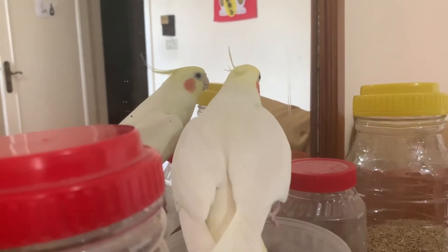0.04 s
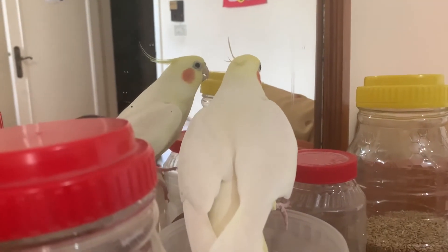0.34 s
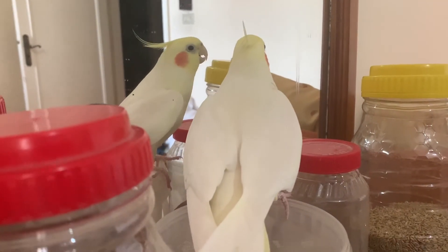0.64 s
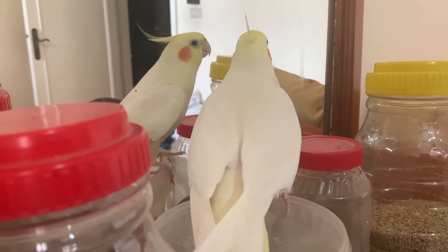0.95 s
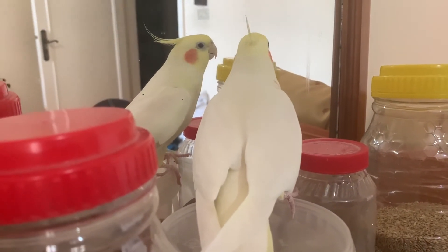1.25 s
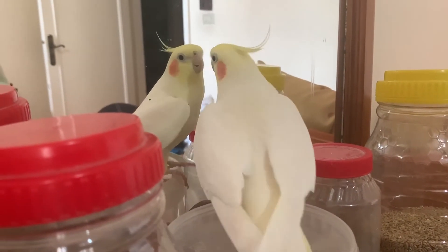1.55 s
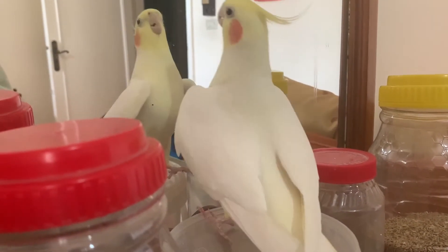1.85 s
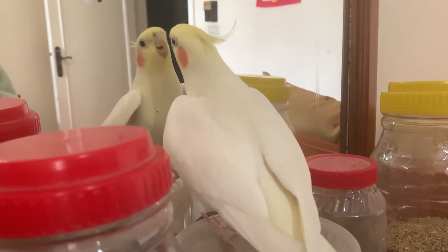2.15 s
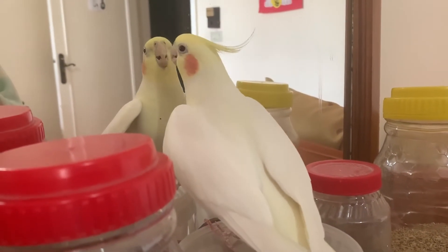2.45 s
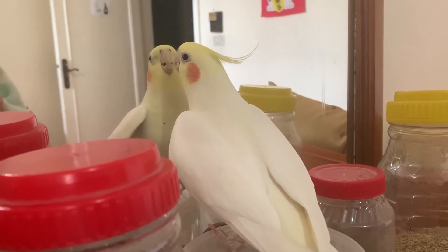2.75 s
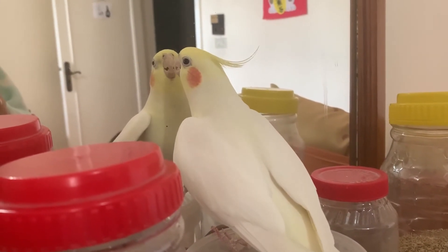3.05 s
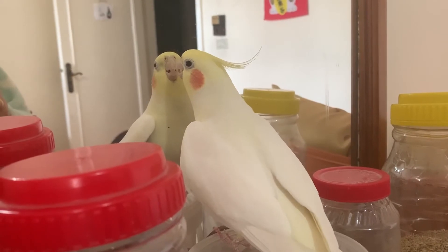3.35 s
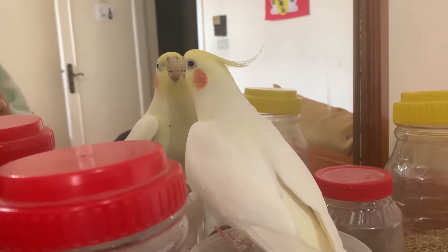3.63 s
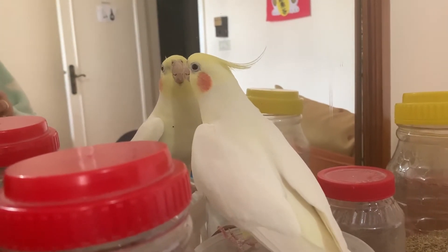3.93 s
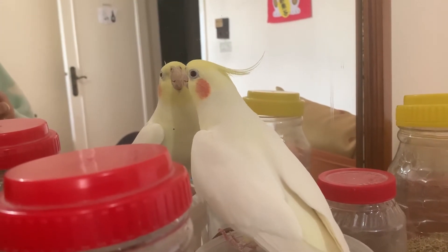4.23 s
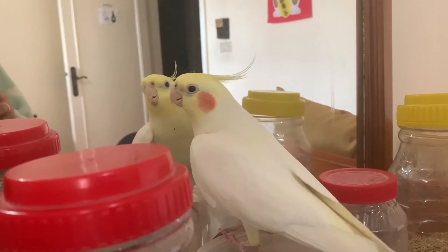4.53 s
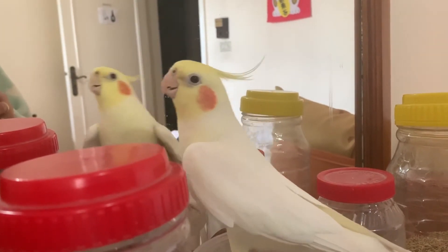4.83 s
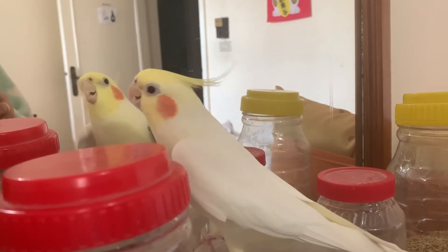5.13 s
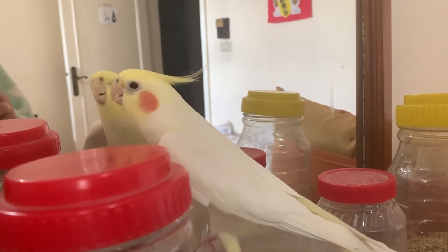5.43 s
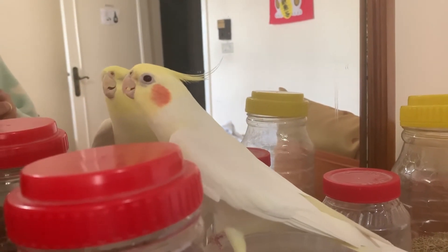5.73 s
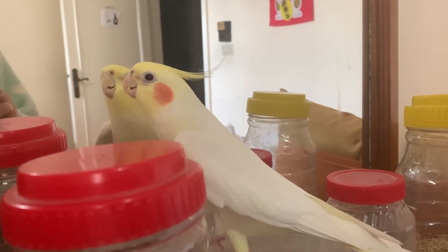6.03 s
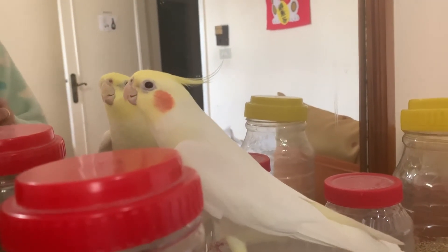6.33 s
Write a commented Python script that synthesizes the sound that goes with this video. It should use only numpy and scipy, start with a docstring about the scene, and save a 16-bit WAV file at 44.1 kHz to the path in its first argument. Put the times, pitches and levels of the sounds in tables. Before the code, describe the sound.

A cockatiel twice shuffles on a plastic tub, then chirps, pips and gives a long, sagging whistle in a faintly humming room.

```python
"""Cockatiel at its mirror

In a small room, heard through a two-port stereo microphone, a cockatiel on the rim of a plastic tub
sings to its mirror image. Twice it shuffles (feathers rustle, claws tick, the tub knocks), then gives
a rising chirp, a short pip and a long whistle that sags at its end. Behind it an appliance hums
faintly, and faint calls come from far off."""
import sys
import numpy as np
from scipy import signal
from scipy.fft import rfft, irfft, next_fast_len
from scipy.io import wavfile

SR = 44100
rng = np.random.default_rng(int(sys.argv[2]) if len(sys.argv) > 2 else 0)


def unload_wav(signal):
    """Save mono or channel-first audio to the path in sys.argv[1] as 16-bit WAV at rate SR, clipped to [-1, 1]."""
    wavfile.write(
        sys.argv[1],
        SR,
        np.round(np.clip(np.atleast_2d(signal).T, -1, 1) * 32767).astype(np.int16),
    )


N = 285768
T = np.arange(N) / SR

# footfalls on the tub: t/s, ring level/dB, tub pitch as a ratio to its rest, slap level/dB
FOOTFALLS = [(.164, -49.5, 0.95, -69), (1.568, -48, 1.09, -59), (1.585, -39, 1.01, -48.5),
             (1.673, -48.5, 1.6, -38.5), (1.678, -43, 1, -46.5), (1.7715, -52, 2.5, -36),
             (1.7925, -31.5, 1.07, -40), (4.539, -57, 2.4, -45), (4.631, -47.5, 1.09, -66),
             (4.7461, -22.5, 1.03, -40)]


def from_db(db):
    return 10 ** (np.asarray(db) / 20)


def rms_one(x):
    return x / np.sqrt(np.mean(x ** 2) + 1e-20)


def at_hz(points, hz, column=1):
    """Reads a column of a table along log frequency."""
    points = np.array(points, float)
    return np.interp(np.log(np.maximum(hz, 1)), np.log(points[:, 0]), points[:, column])


def in_time(curve, t):
    """Reads a curve of (time, value) points at times t."""
    return np.interp(t, *np.transpose(curve))


def gate(t, start, end, rise, fall):
    """Smooth opening and closing of a note."""
    return np.sin(np.pi / 2 * np.clip((t - start) / rise, 0, 1) * np.clip((end - t) / fall, 0, 1)) ** 2


def swell(middle, length):
    """A smooth rise and fall around a moment."""
    return gate(T, middle - length / 2, middle + length / 2, length / 2, length / 2)


def drift(rate_hz):
    """Random wander up to about rate_hz, rms 1."""
    hz = np.arange(N // 2 + 1) * SR / N
    return rms_one(irfft(rfft(rng.standard_normal(N)) / (1 + (hz / rate_hz) ** 4), N))


def noise(colour):
    """Noise of a given colour, rms 1."""
    hz = np.arange(N // 2 + 1) * SR / N
    return rms_one(irfft(rfft(rng.standard_normal(N)) * from_db(at_hz(colour, hz)), N))


def phase_of(hz):
    return 2 * np.pi * np.cumsum(hz) / SR


def sine(phase, db):
    """A sine of the given rms level."""
    return np.sqrt(2) * from_db(db) * np.sin(phase)


def room_air(level_db=-55.5, side_db=-15):
    """The steady air of the room, slightly different left and right."""
    colour = [(20, -14.5), (37, -8), (60, 1), (88, -9.5), (154, -6), (193, -19), (230, -18), (430, -28),
              (760, -26), (1480, -36), (2140, -40.5), (4500, -49), (6000, -55.5), (12000, -50.5),
              (16000, -57.5)]  # f/Hz, relative density/dB
    return from_db(level_db) * (noise(colour) + from_db(side_db) * noise(colour) * np.array([[1], [-1]]))


def low_wash(level_db=-72, swell_db=5.5, swell_hz=1.3):
    """A low wash of noise in the room, slowly swelling and ebbing."""
    colour = [(120, -16.5), (280, 2.5), (600, 9), (850, -12.5), (1500, -0.5), (2200, -38.5)]  # f/Hz, relative density/dB
    return from_db(level_db + swell_db * drift(swell_hz)) * noise(colour)


def appliance_hum(waver=0.09, wander_rad=1.0):
    """An appliance hums: a few low tones, wavering in level and phase."""
    tones = [(57.5, -64.5), (115, -64), (160, -72.5), (229, -71)]  # f/Hz, level/dB
    return sum(sine(2 * np.pi * hz * T + wander_rad * drift(0.8), db) * (1 + waver * drift(4.9))
               for hz, db in tones)


def far_calls(blur_hz=450, fall_per_s=.6):
    """Faint calls far off: clear ones hold their pitch, blurred ones are noisy and fall."""
    calls = [(.02, .12, 803, -64, 0), (0.256, 0.15, 1320, -71.5, 0.13), (.49, 0.25, 754, -65, 0.1),
             (.48, 0.21, 4080, -74.5, 0.83), (1.19, .14, 3340, -80, 0.7), (1.98, .2, 3740, -77, 0.8),
             (3.769, .19, 3703, -74.5, 0.67), (6.41, .28, 4400, -78.5, 1)]  # peak t/s, length/s, f/Hz, level before blurring/dB, blur 0-1
    out, smear = np.zeros(N), drift(blur_hz)
    for peak, length, hz, db, blur in calls:
        pitch = hz * (1 - fall_per_s * blur * np.clip(T - peak, -length, length))
        out += sine(phase_of(pitch), db) * (1 - blur + blur * smear) * swell(peak, length)
    return out


def feathers(grain_db=3.0, patchy_db=3, gain_db=1, bands=10):
    """Barbs slip over each other in clumps, each patch of feather with a colour of its own."""
    strokes = [(1.526, 0.15, -58), (1.646, 0.19, -55), (1.816, 0.23, -63.5), (4.475, 0.27, -58.5),
               (4.597, 0.12, -52), (5.807, 0.087, -69)]  # feather on feather: peak t/s, length/s, level before gain/dB
    colour = [(600, -20.5), (1400, 9), (2000, -9.5), (2600, 14.5), (4200, -3.5), (5300, -6), (6800, 0),
              (8300, 6.5), (10000, -1.5), (12400, -3.5), (15500, -1.5)]  # f/Hz, relative density/dB
    envelope = sum(from_db(db) * swell(peak, length) for peak, length, db in strokes)
    brush, patches = noise(colour), np.zeros(N)
    edges_hz = np.geomspace(600, 17000, bands + 1)
    for k, band in enumerate(zip(edges_hz, edges_hz[1:])):
        bandpass = signal.butter(2, band, "band", fs=SR, output="sos")
        patch = signal.sosfilt(bandpass, np.roll(brush, k * N // bands))
        patches += patch * from_db(patchy_db * drift(22))
    return from_db(gain_db) * envelope * rms_one(patches * from_db(grain_db * drift(250)))


def claw_ticks(t60=0.022, gain_db=-5.0, footfall_db=-5):
    """Claws and beak make short dry scratches, alone and with every footfall."""
    lone_ticks = [(0.167, -47.5), (.272, -58), (1.5977, -34), (1.711, -45), (2.111, -55), (2.162, -59),
                  (4.4192, -51.5), (4.570, -32.5), (4.598, -44.5), (4.7404, -32), (4.8892, -35.5)]  # t/s, level before gain/dB
    colour = [(700, -4.5), (1500, 1), (3200, -1.5), (4800, 2.5), (6500, -9.5), (8500, 5), (12000, 2.5),
              (15500, -7.5)]  # f/Hz, relative density/dB
    touches = lone_ticks + [(start, slap_db + footfall_db) for start, _, _, slap_db in FOOTFALLS]
    envelope = sum(from_db(db - 60 * np.clip(T - start, 0, .1) / t60) * (T >= start)
                   for start, db in touches)
    return from_db(gain_db) * envelope * noise(colour)


def tub_knocks(contact_s=0.0024, slap_t60=0.019):
    """Each footfall slaps the tub and sets it ringing; the gripping foot shifts its pitch."""
    modes = [(310, -14, 0.013), (359, 4, 0.041), (486.4, 7, 0.027), (569.4, -3, 0.046), (845, -40, 0.054),
             (1210, -8.5, 0.031), (1930, -34, 0.012), (2322, -22.5, 0.016), (3000, -27, 0.043)]  # the tub at rest: f/Hz, relative level/dB, t60/s
    slap_colour = [(250, -15.5), (600, 1.5), (1600, -8.5), (2400, 2), (3500, -17.5), (6000, -25)]  # f/Hz, relative density/dB
    out, age, slap = np.zeros(N), T[:SR // 5], noise(slap_colour)
    for start, ring_db, shift, slap_db in FOOTFALLS:
        ring = 0
        for hz, mode_db, t60 in modes:
            decay = from_db(ring_db + mode_db + rng.normal(0, 1) - 60 * age / t60)
            ring += decay * np.sin(2 * np.pi * hz * shift * age)
        here = int(start * SR) + np.arange(len(age))
        out[here] += ring * (1 - np.exp(-age / contact_s))
        out[here] += slap[here] * from_db(slap_db - 60 * age / slap_t60)
    return out


def chirps(beak_db=9, beak_width_hz=280, ring_hz=6500, ring_width_hz=500,
           rasp_db=-19, relax_db=10.5, flicker_db=3.5, count=13):
    """A fast upward sweep; the overtones open with the strain and flare at the beak's resonances."""
    # t/s, length/s, start f/Hz, end f/Hz, fundamental level/dB, overtone base level/dB,
    # beak resonance f/Hz, moment of most strain 0-1, gain at ring_hz/dB
    sweeps = [(2.3127, .047, 1028, 1774, -25.5, -22.5, 3178, 0.65, -0.5),
              (4.9101, .041, 1032, 1700, -33, -23, 2925, 0.58, 9)]
    throat = [(1000, -16), (2300, -2), (3400, -4.5), (4400, -2.5), (5300, -9), (6300, -14.5), (7400, -26.5),
              (8400, -21.5), (9800, -38.5), (11500, -33), (15500, -35.5)]  # throat and open beak: f/Hz, gain/dB
    out, rasp = np.zeros(N), noise(throat)
    shake = .012 * drift(900) + .012 * drift(120)
    flicker = drift(130)
    for start, length, low_hz, high_hz, note_db, overtone_db, beak_hz, strain_at, ring_db in sweeps:
        on = (T > start) & (T < start + length)
        progress = (T[on] - start) / length
        pitch = low_hz + (high_hz - low_hz) * progress
        phase = phase_of(pitch * (1 + shake[on]))
        slack_db = relax_db * (2 * (progress - strain_at)) ** 2
        pulsed_rasp = rasp[on] * (1 + np.cos(phase))
        note = sine(phase, note_db) + from_db(overtone_db + rasp_db - slack_db) * pulsed_rasp
        for k in range(2, count):
            hz = k * pitch
            off_beak, off_ring = (hz - beak_hz) / beak_width_hz, (hz - ring_hz) / ring_width_hz
            colour_db = at_hz(throat, hz) + beak_db / (1 + off_beak ** 2) + ring_db / (1 + off_ring ** 2)
            uneven_db = flicker_db * np.roll(flicker, k * N // count)[on]  # each flickers on its own
            db = overtone_db + colour_db + uneven_db - slack_db * min(k - 1.5, 3.2)
            note += sine(k * phase - np.arctan(off_beak), db)  # the resonance turns the phase
        out[on] += note * gate(T[on], start, start + length, rise=0.0091, fall=0.015)
    return out


def pips(mellow_db_per_s=900, buzz_hz=13000, buzz_db_per_octave=22, swell_db=8, count=13):
    """A pip starts with a buzzy snap and mellows at once into a pure tone."""
    # t/s, length/s, f/Hz, level/dB; relative to that at the attack:
    # second harmonic/dB, fall per further harmonic/dB, buzz peak/dB
    notes = [(2.513, 0.053, 1204, -17.5, -4.5, 21.5, -35), (5.09, 0.054, 1199, -24.5, -6.5, 6, -20.5)]
    out, waver = np.zeros(N), drift(110)
    for start, length, pitch, db, bright_db, fall_db, buzz_db in notes:
        on = (T > start) & (T < start + length)
        age = T[on] - start
        phase = phase_of(pitch * (1 + 0.023 * waver[on]))
        note = sine(phase, db - swell_db * (2 * age / length - 1) ** 2)
        for k in range(2, count + 1):
            octaves_off = abs(np.log2(k * pitch / buzz_hz))
            snap_db = max(bright_db - fall_db * (k - 2), buzz_db - buzz_db_per_octave * octaves_off)
            uneven_db = 3 * np.roll(waver, k * N // count)[on]
            note += sine(k * phase, db + snap_db + uneven_db - mellow_db_per_s * age)
        out[on] += note * gate(T[on], start, start + length, rise=0.0028, fall=0.018)
    return out


def voice_crack(t, phase, note_db, count=7):
    """The voice cracks into half pitch: alternate cycles differ, adding lines between the harmonics."""
    crack = (5.232, 5.273, -25)  # start t/s, end t/s, level against the note/dB
    start, end, crack_db = crack
    lines = sum(sine((k + .5) * phase, note_db + crack_db - 16 * np.log2(max(k, 1)))
                for k in range(count))
    return lines * gate(t, start, end, rise=0.013, fall=0.0023)


def whistles(tremor_db=1.0, flutter_db=1.5, breath_db=-47, fourth_db=-37.5, count=15):
    """A nearly pure held note with a slight tremor; as its pitch sags it weakens and gains the octave."""
    # t/s, length/s, level/dB, release/s, second harmonic against the note/dB,
    # fifth and higher harmonics against the third/dB
    notes = [(2.64, 0.909, -24.5, 0.16, -33.5, -13.5), (5.226, 0.7606, -24.5, 0.028, -48, -12.5)]
    melodies = [
        [(2.66, 1104), (3.102, 1100), (3.124, 1066), (3.204, 1078), (3.338, 1046), (3.352, 1022), (3.48, 1001)],
        [(5.28, 1095), (5.328, 1102), (5.344, 1119), (5.428, 1118), (5.526, 1091), (5.762, 1106), (5.822, 1076),
         (5.936, 1061), (5.972, 997.6)],
    ]  # pitch of each whistle: t/s, f/Hz
    third_curves = [
        [(2.645, -79), (2.683, -63.5), (2.801, -71), (2.915, -69.5), (2.923, -69.5), (3.329, -73), (3.375, -94),
         (3.45, -82)],
        [(5.23, -71), (5.28, -56.5), (5.362, -66.5), (5.574, -56), (5.602, -65.5), (5.826, -63.5),
         (5.942, -71.5), (5.97, -88)],
    ]  # third harmonic of each whistle: t/s, base level/dB
    colour = [(2200, 7), (3300, 2.5), (4400, -11.5), (5500, -10), (6600, -2), (7700, -24), (8800, -2),
              (9900, -6), (11000, -10.5), (12100, -13.5), (13200, -16), (15500, -21.5)]  # added to every overtone's base level: f/Hz, gain/dB
    scoop_hz, scoop_s = 15, 0.16  # starts flat and eases up to pitch
    full_effort_hz = 1089  # below this pitch the voice slackens
    slack_start_hz, settle_s = 80, 0.023  # the slack start counts as extra sag
    note_db_per_hz, second_db_per_hz = -0.0333, 0.1378  # for each Hz of sag
    fade_db_per_s = 6  # the air runs out
    out, tremor = np.zeros(N), drift(20)
    waver = 0.0052 * drift(26) + 0.0019 * drift(580)
    flutter = drift(24)
    breath = noise([(700, -27), (1100, 7.5), (1700, -10), (4500, -17), (7000, -40), (15000, -31.5)])
    for whistle, melody, third_curve in zip(notes, melodies, third_curves):
        start, length, level_db, release_s, second_db, top_db = whistle
        on = (T > start) & (T < start + length)
        t, age = T[on], T[on] - start
        pitch = in_time(melody, t) - scoop_hz * np.exp(-age / scoop_s)
        sag_hz = np.maximum(full_effort_hz - pitch, 0) + slack_start_hz * np.exp(-age / settle_s)
        db = level_db - fade_db_per_s * age + note_db_per_hz * sag_hz
        phase = phase_of(pitch * (1 + waver[on]))
        note = sine(phase, db + tremor_db * tremor[on]) + from_db(db + breath_db) * breath[on]
        third_db = in_time(third_curve, t)
        low_harmonics = {2: db + second_db + second_db_per_hz * sag_hz, 3: third_db, 4: db + fourth_db}
        for k in range(2, count):
            base_db = low_harmonics.get(k, third_db + top_db)
            uneven_db = flutter_db * np.roll(flutter, k * N // count)[on]
            note += sine(k * phase, base_db + at_hz(colour, k * np.median(pitch)) + uneven_db)
        note += voice_crack(t, phase, db)
        out[on] += note * gate(t, start, start + length, rise=.0065, fall=release_s)
    return out


def small_room(x, first_echo_s=0.0081, side_db=-7):
    """Direct sound plus a diffuse tail that dies band by band, a little different left and right."""
    decay_times = [(200, 0.35), (1200, 0.42), (3000, 0.31), (6000, 0.29), (15000, 0.1)]  # f/Hz, t60/s
    tail_colour = [(200, -18.5), (600, -12.5), (1000, -24), (1200, -19.5), (1500, -10), (2200, -9),
                   (3000, -11), (5000, -12.5), (8000, -13.5), (15000, -10.5)]  # f/Hz, level against the direct sound/dB
    size = next_fast_len(N + SR)
    hz, age = np.arange(size // 2 + 1) * SR / size, T[:SR // 2]
    tail, edges_hz = 0, np.geomspace(100, 18000, 9)
    for low, high in zip(edges_hz, edges_hz[1:]):
        decay = from_db(-60 * age / at_hz(decay_times, np.sqrt(low * high))) * (age > first_echo_s)
        mid, side = rng.standard_normal((2, len(age))) * decay / np.sqrt(np.sum(decay ** 2))
        echoes = mid + from_db(side_db) * side * np.array([[1], [-1]])
        tail += signal.sosfilt(signal.butter(2, [low, high], "band", fs=SR, output="sos"), echoes)
    response = 1 + rfft(tail, size) * from_db(at_hz(tail_colour, hz))
    return irfft(rfft(x, size) * response, size)[:, :N]


def microphone_ports(x):
    """The two ports pick up each frequency with their own balance and phase."""
    # f/Hz, left minus right/dB, left lead/rad; in the treble the left lags by about 0.25 ms
    ports = [(100, -2, 0), (250, -.5, .2), (500, 3.3, .3), (1100, 3.7, .55), (1550, 4, .9), (2000, 1, -1.5),
             (2300, 1.5, -2.3), (3000, 2, -2.4), (3550, -2, -1), (4500, -5, -.9), (6400, 0, 1.3),
             (7750, 0, 0), (9750, 0, -3.14), (11600, 0, -6.28), (13500, 0, -9.42), (15400, 0, -12.57)]
    size = next_fast_len(N + SR // 10)
    hz = np.arange(size // 2 + 1) * SR / size
    left = from_db(at_hz(ports, hz) / 2) * np.exp(.5j * at_hz(ports, hz, column=2))
    mean_power = (abs(left) ** 2 + abs(left) ** -2) / 2
    pair = np.array([left, 1 / left]) / np.sqrt(mean_power)
    return irfft(rfft(x, size) * pair, size)[:, :N]


def scene():
    """The bird and its perch in the small room, with the quiet background behind them."""
    bird = chirps() + pips() + whistles() + tub_knocks() + claw_ticks() + feathers()
    return small_room(bird) + appliance_hum() + far_calls() + room_air() + low_wash()


def record(dry):
    """The two-port microphone, cut steeply above 16 kHz."""
    lowpass = signal.ellip(10, .2, 80, 16000, fs=SR, output="sos")
    return signal.sosfilt(lowpass, microphone_ports(dry))


dry = scene()
out = record(dry)
unload_wav(out)
```